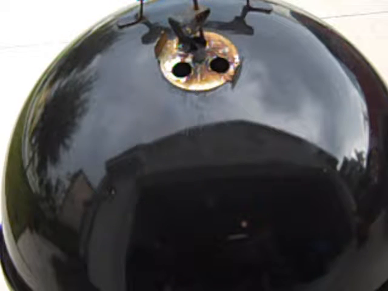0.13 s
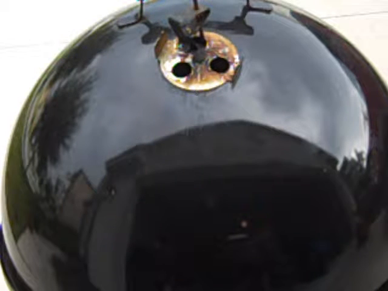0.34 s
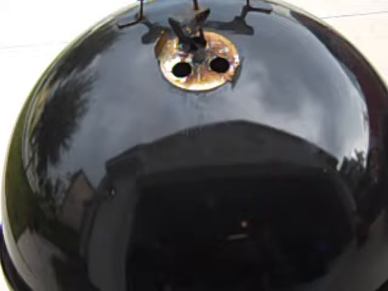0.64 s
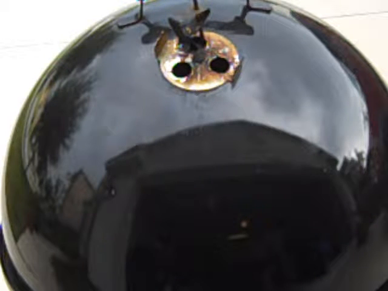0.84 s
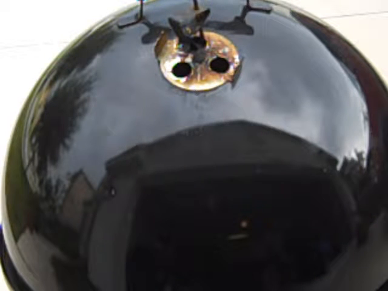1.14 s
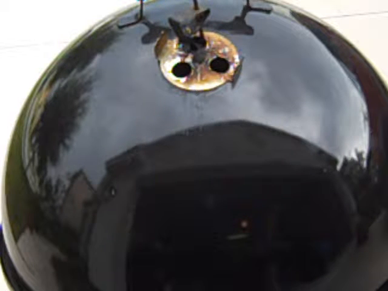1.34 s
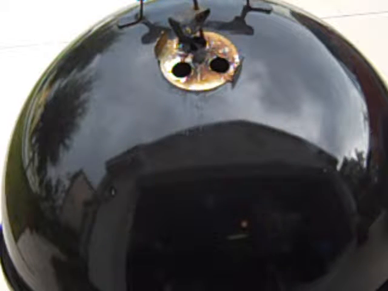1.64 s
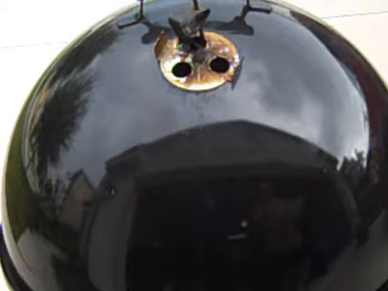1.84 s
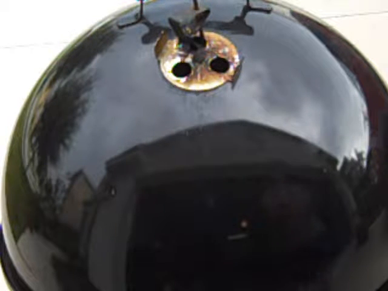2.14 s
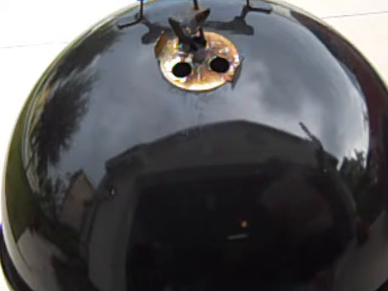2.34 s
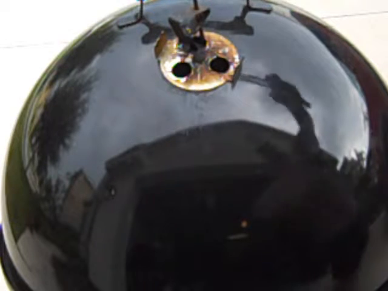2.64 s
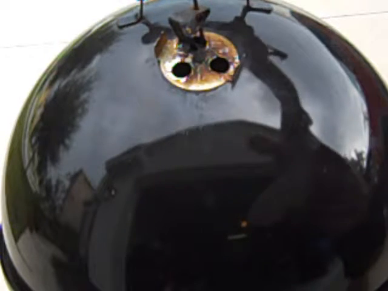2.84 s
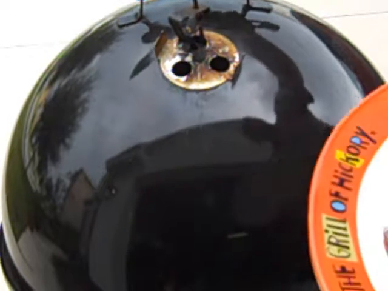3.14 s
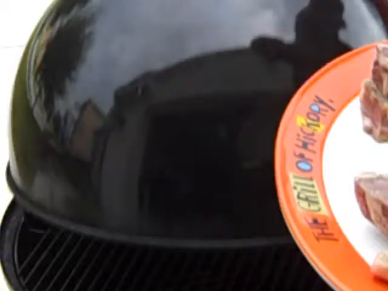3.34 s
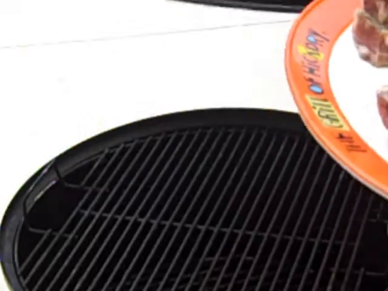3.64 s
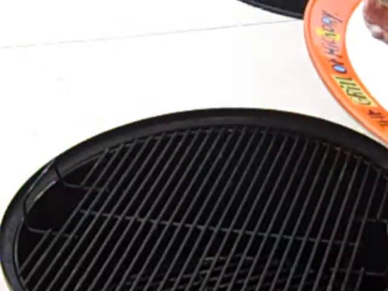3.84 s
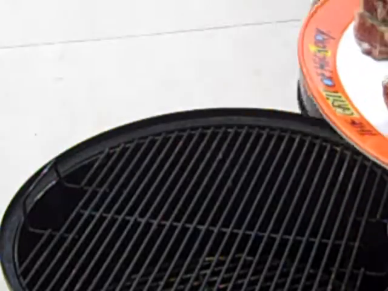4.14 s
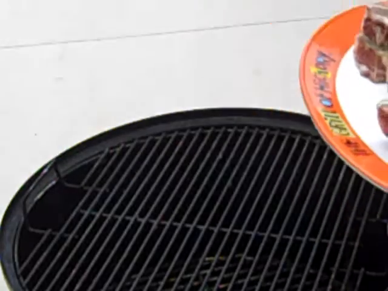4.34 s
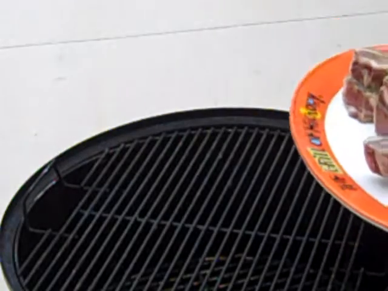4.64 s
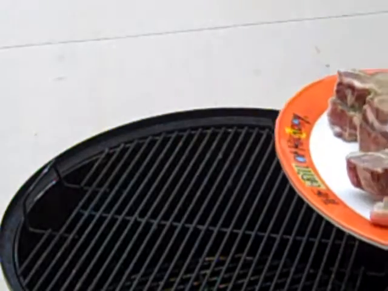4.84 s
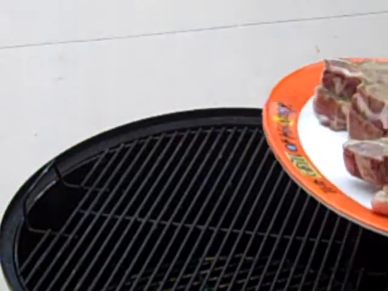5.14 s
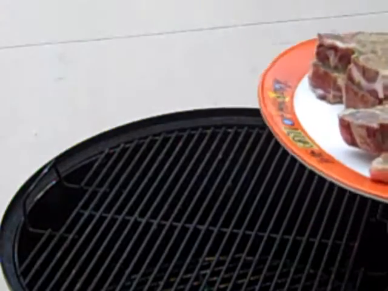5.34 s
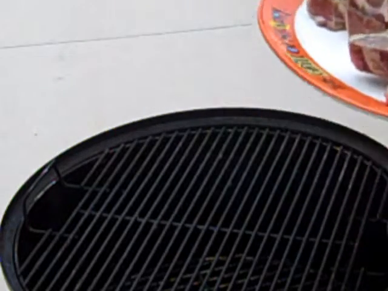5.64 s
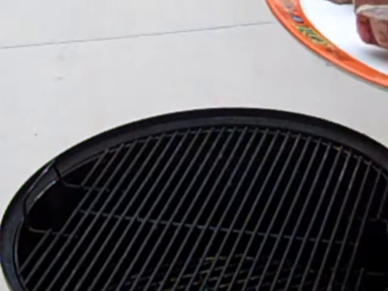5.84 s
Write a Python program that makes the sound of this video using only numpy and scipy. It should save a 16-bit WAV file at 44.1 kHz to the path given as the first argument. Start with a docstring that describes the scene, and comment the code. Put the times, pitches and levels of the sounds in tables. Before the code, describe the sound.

Outdoors over faint traffic rumble and hiss, shoes scuff, steel tongs rattle, then a metal lid clangs down on concrete with a short grind.

```python
"""A kettle grill on a concrete drive, under far traffic rumble and a faint steady hiss (banded noise).
Shoes scuff (clumped grit clicks), a small steel part pings (ringing modes), a dull pop follows, then steel
tongs rattle in a hand (crowded modes struck in chatter). The domed lid's rim drags (rubbing grains), shoes
scuff again, and the lid is set down: thump and clang (struck modes), then a fading grind under more rattle."""
import sys
import numpy as np
from scipy import signal
from scipy.fft import rfft, irfft, next_fast_len
from scipy.io import wavfile

SR = 44100
rng = np.random.default_rng(int(sys.argv[2]) if len(sys.argv) > 2 else 0)


def unload_audio(sound):
    """Save the sound as a 16-bit wav file, at the path given as the first command line argument."""
    columns = np.transpose(np.atleast_2d(sound))
    # keep every value between -1 and 1, then stretch to whole-number steps
    steps = np.round(np.clip(columns, -1, 1) * 32767)
    wavfile.write(sys.argv[1], SR, steps.astype(np.int16))


N = 264159

# far traffic swells: t/s, deep rumble level/dB, low rumble level/dB
TRAFFIC_SWELLS = [(0, -5, -4), (1.2, -6.5, -5.5), (1.6, 0.5, -4), (2.1, -4.5, -5), (2.8, -4.5, -5),
                  (3.7, -1, -3.5), (4.1, -6.5, -3.5), (4.35, 0.5, 1.5), (4.75, -4, -1.5), (5.99, -3.5, -4)]
# spectrum of rumble and hiss: f/Hz, density level/dB per Hz
AIR_SPECTRUM = [(13, -87), (26, -39), (48, -4), (95, -3.5), (123, -1), (200, -9), (330, -7.5), (462, -15.5),
                (900, -20), (2960, -28.5), (5000, -31.5), (7400, -29), (9000, -35), (11000, -50.5),
                (13800, -54)]
# left-right likeness of the air: f/Hz, likeness/1
AIR_LIKENESS = [(60, 0.99), (230, 0.99), (890, 0.91), (3450, 0.53), (13300, 0.31)]

# shoe scuffs: start t/s, peak level/dB, rise/s, hold/s, fade/(dB/s), sole band level/dB
SHOE_SCUFFS = [(0.376, -40, .034, .01, 40, -4), (0.668, -31.5, 0.014, .002, 147, -4),
               (2.626, -52, 0.03, 0.063, 64, -3), (3.673, -42, 0.039, 0.059, 10, -1.5),
               (3.835, -29, 0.065, 0.079, 590, 3.5)]
# spectrum of grit under a sole: f/Hz, density level/dB per Hz
GRIT_SPECTRUM = [(290, -49), (558, -33), (650, -14), (1550, -11), (2130, -3), (2440, -6), (3490, -3),
                 (4870, -10.5), (6960, -5), (10800, -22.5), (13500, -99)]
SCUFF_RISE_DB, SCUFF_LONGEST_S = 30.5, 0.29   # the sole presses down; lifts at the latest then

# dull pop close by: t/s, peak level/dB
DULL_POP = [(1.3675, -31)]
POP_WIDTH_S = 0.00027

# knock on a small steel part: t/s, peak level/dB
PING_KNOCK = [(0.685, -20)]
# its modes: f/Hz, level/dB, t60/s
PING_RING = [(1344, 8, 0.3), (1670, 5, 0.23), (2010, 8, 0.13), (2426, 19, 0.06), (4370, 16, 0.059),
             (6923, 11, 0.37), (7117, -6, 0.44), (8030, 8, 0.42), (9230, 11, 0.2)]

# tongs and grit clicks: t/s, peak level/dB, colour centre f/Hz, chatter length/s,
# chatter level against the first touch/dB (before a common 3 dB cut)
TONG_CLICKS = [(0.673, -35.5, 3000, 0.012, -15), (1.6576, -10, 7400, 0.028, -27),
               (1.697, -21.5, 6540, 0.064, -26.5), (1.79, -22.5, 5900, 0.073, -12),
               (1.827, -14.5, 7740, 0.014, -13), (1.8684, -17.5, 6350, 0.029, -15),
               (1.9037, -18, 7560, 0.038, -16), (1.957, -22, 7100, 0.01, -15),
               (1.9636, -16.5, 7500, 0.0065, -6), (1.97, -7, 7700, 0.0044, -13),
               (1.977, -12, 8150, 0.017, -12), (1.991, -20, 7900, 0.011, -12),
               (2.01, -29.5, 6800, 0.12, -3), (2.1925, -28, 6460, 0.013, -3),
               (2.228, -20, 9400, 0.011, -20.5), (2.787, -37.5, 9000, 0.01, -20),
               (3.146, -22, 5400, 0.014, -4), (3.8074, -17, 3200, 0.008, -39),
               (4.257, -41.5, 9500, 0.012, -10), (4.406, -32.5, 2610, 0.016, -38),
               (4.468, -36, 6900, 0.018, -26), (5.3245, -30.5, 4800, 0.028, -18),
               (5.49, -37.5, 7700, 0.03, -10), (5.5654, -22.5, 7350, 0.022, -19.5),
               (5.579, -17, 6560, 0.028, -21), (5.601, -20, 7700, 0.011, -13),
               (5.6387, -18.5, 7800, 0.013, -19), (5.654, -19.5, 6500, 0.014, -19.5),
               (5.7403, -27.5, 6900, 0.03, -16.5), (5.779, -29, 7820, 0.012, -21),
               (5.8082, -24, 7600, 0.017, -13), (5.885, -22.5, 6650, 0.016, -15),
               (5.9447, -26.5, 6760, 0.018, -17)]
# strength of the crowded modes of the tongs: f/Hz, level/dB
TONG_SPECTRUM = [(590, -57), (1000, -19), (2720, -11), (3580, -8.5), (5770, -5), (6580, 3), (7660, 7.5),
                 (9530, 0.5), (12900, -8.5), (13500, -36)]
# where the tongs are: t/s, left-right level at 8 kHz/dB
HAND_PAN = [(1.65, 1), (1.9, 0), (2.2, 6.5), (5.5, 5), (5.95, 6)]
COLOUR_OCTAVES = 0.82   # a blow is 6 dB weaker this far from its colour centre

# lid rim meets concrete: t/s, clang peak level/dB, thump peak level/dB
LID_LANDINGS = [(4.946, -20, -11.5), (4.9725, -5.5, -15)]
# modes of the dome: f/Hz, level/dB, t60/s
DOME_MODES = [(150, 2.5, 0.056), (207, 2.5, 0.051), (288, 6, 0.025), (388, -7, 0.088), (459, -10.5, 0.071),
              (520, -13, 0.19), (552, -7.5, 0.28), (721, -22, 0.12), (811, -13, 0.23)]
# modes of the rim: f/Hz, level/dB, t60/s
RIM_MODES = [(1737, -14, 0.065), (3410, -5, 0.043), (3542, 2, 0.084), (3740, 10, 0.04), (3626, 6, 0.05),
             (3850, -6, 0.23), (3935, -8, 0.26), (4160, -16, 0.96)]
# spectrum of the rubbing rim: f/Hz, density level/dB per Hz
GRIND_SPECTRUM = [(880, -56), (1600, -24), (2900, -18.5), (3350, -5), (4150, 1), (5240, -9), (7360, -2.5),
                  (10200, -22), (12500, -19), (13500, -54)]
# the rim drags off the kettle: t/s, level/dB
LID_LIFT = [(3.18, -56), (3.24, -46.5), (3.35, -63)]
# levels at the first and last landing, then the fade
GRIND_BEFORE_DB, GRIND_DB, GRIND_FADE_DB_PER_S = -32.5, -28, 51.5

# ground sounds at the left port: f/Hz, phase lead/rad, gain level/dB
GROUND_TO_LEFT = [(1670, -0.16, -0.5), (3600, -1.5, -0.5), (4370, -0.7, -1.5), (7300, 1.46, 0),
                  (8500, -1.5, 6.5), (13100, -3, 1.5)]
WALLS_T60_S, WALLS_DB, WALLS_AFTER_S = 0.23, -9, 0.0028   # scattered echoes of house and garage
LEFT_PORT_DB, CUTOFF_HZ = -0.63, 13900


def from_db(db):
    """Decibels to gain."""
    return 10 ** (np.asarray(db) / 20)


def rms_one(x):
    """Scale to unit rms."""
    return x / np.sqrt(np.mean(x ** 2) + 1e-20)


def in_time(rows):
    """Columns of a curve at every sample."""
    s, *columns = np.transpose(rows)
    return [np.interp(np.arange(N) / SR, s, c) for c in columns]


def while_sounding(rows):
    """1 within the span of a curve, 0 outside, with soft edges."""
    t = np.arange(N) / SR
    to_edge_s = np.minimum(t - rows[0][0], rows[-1][0] - t)
    return np.clip(to_edge_s / 0.0028, 0, 1)


def stroke(start_s, rows):
    """Gain of a curve of (s after the start, dB), silent outside it."""
    rows = [(start_s + s, db) for s, db in rows]
    return from_db(in_time(rows)[0]) * while_sounding(rows)


def at_hz(points, hz):
    """Read a table on a log-frequency axis."""
    table_hz, values = np.array(points).T[:2]
    return np.interp(np.log(hz), np.log(table_hz), values)


def coloured(x, spectrum):
    """Shape a long sound by a spectrum; rms 1."""
    size = next_fast_len(N)
    hz = np.maximum(np.arange(size // 2 + 1) * SR / size, 1)
    shaped = rfft(x, size) * from_db(at_hz(spectrum, hz))
    return rms_one(irfft(shaped, size)[..., :N])


def drift(rate_hz):
    """Slow chance, rms 1: noise through a double pole, computed every 40 samples."""
    r = np.exp(-80 * np.pi * rate_hz / SR)
    noise = rng.standard_normal(N // 40 + 2002)
    slow = signal.lfilter([1], [1, -2 * r, r * r], noise)[2000:]   # skip the filter's start
    return np.interp(np.arange(N) / 40, np.arange(len(slow)), rms_one(slow))


def grains(per_s, spread_db, size=N):
    """Random clicks of uneven size and sign."""
    size_db = spread_db * np.minimum(rng.exponential(1, size), 4)
    sizes = from_db(size_db) * rng.choice([-1, 1], size)
    return sizes * (rng.random(size) < per_s / SR)


def stereo(x, other, alike):
    """Left and right share x and differ by a second sound."""
    alike = np.clip(alike, 0, 1)
    return (np.sqrt(1 + alike) * x + np.sqrt(1 - alike) * other * [[1], [-1]]) / np.sqrt(2)


def crowded(spectrum, t60_s, count):
    """Many unrelated modes under a spectrum; higher ones tend to die sooner (t60_s holds near 6 kHz)."""
    points = np.array(spectrum)[1:-1, 0]
    hz = np.geomspace(points[0], points[-1], count) * np.exp(rng.normal(0, 0.0143, count))
    decay_s = t60_s * (hz / 6000) ** -.5 * np.exp(rng.normal(0, 0.078, count))
    return np.transpose([hz, at_hz(spectrum, hz), decay_s])


def struck(modes, gains_db, scatter_db, size, pan_db=0, start_rad=0):
    """Ring after one blow; each mode has its own phase at each port, treble leans most to a side."""
    hz, level_db, t60_s = np.transpose(modes)
    t = np.arange(size) / SR
    rates = 2j * np.pi * hz - np.log(1000) / np.clip(t60_s, .01, 1.5)
    waves = np.exp(t * rates[:, None])
    strength_db = level_db + gains_db + scatter_db * rng.standard_normal(len(hz))
    strength = from_db(strength_db) * np.exp(1j * start_rad)
    turn_rad = rng.normal(0, .6, len(hz)) * np.minimum(hz / 7000, 1)
    lean = pan_db * (hz / 8000) * np.log(10) / 40 + 1j * turn_rad
    return np.imag([strength * np.exp(side * lean) @ waves for side in (1, -1)])


def add(out, sound, s, peak_db):
    """Place a stereo sound at a time, with a given peak of its left-right mean."""
    at = round(s * SR)
    gain = from_db(peak_db) / np.max(np.abs(sound.mean(axis=0)))
    out[:, at:at + sound.shape[1]] += (gain * sound)[:, :N - at]


def air():
    """Half-octave bands of noise; rumble swells with the traffic and is patchy, hiss stays smoother."""
    deep_db, low_db = in_time(TRAFFIC_SWELLS)
    edges_hz = 22 * 2 ** np.arange(0, 9.6, .5)
    noise = coloured(rng.standard_normal((2, 2, N)), AIR_SPECTRUM)
    out = 0
    for k, (low, high) in enumerate(zip(edges_hz, edges_hz[1:])):
        hz = np.sqrt(low * high)
        bandpass = signal.butter(2, [low, high], "band", fs=SR, output="sos")
        band = signal.sosfilt(bandpass, noise[k % 2])   # neighbours use separate noise
        swell_db = deep_db if hz < 160 else low_db if hz < 420 else 0
        patchy_db = 1.5 if hz < 1000 else .7
        gain = from_db(swell_db + patchy_db * drift(10.1))
        out = out + gain * stereo(*band, at_hz(AIR_LIKENESS, hz))
    return from_db(-44.0) * rms_one(out)


def scuffs():
    """Grit rolls under a sole: dense clicks in clumps; a heavier slide brings out a band around 3 kHz."""
    clumps = from_db(2.0 * drift(28))
    ports = [coloured(clumps * grains(5000, 2.2), GRIT_SPECTRUM) for port in range(2)]
    grit = stereo(*ports, 0.7)
    sole = signal.sosfilt(signal.butter(2, [1900, 4800], "band", fs=SR, output="sos"), grit)
    out = 0
    for s, peak_db, rise_s, hold_s, fade_db_per_s, sole_db in SHOE_SCUFFS:
        held_s = rise_s + abs(hold_s)
        end_db = peak_db - fade_db_per_s * (SCUFF_LONGEST_S - held_s)
        gain = stroke(s, [(0, peak_db - SCUFF_RISE_DB), (rise_s, peak_db), (held_s, peak_db),
                          (SCUFF_LONGEST_S, end_db)])
        out = out + gain * (grit + (from_db(sole_db) - 1) * sole)
    return out


def pop(size=200):
    """A single pull and push of air."""
    out = np.zeros((2, N))
    widths = np.arange(size) / SR / POP_WIDTH_S - 3
    pulse = widths * np.exp(-widths ** 2 / 2)
    add(out, np.tile(pulse, (2, 1)), *DULL_POP[0])
    return out


def ping(size=16000):
    """One sharp knock on a small steel part: ringing modes with a broad crack."""
    out, t = np.zeros((2, N)), np.arange(size) / SR
    ring = struck(PING_RING, 0, 1.8, size, 0.93)
    crack = signal.lfilter([1, 1, -1, -1], [1], rng.standard_normal(size)) * np.exp(-t / 0.002)
    add(out, ring / np.abs(ring).max() + from_db(-12) * crack, *PING_KNOCK[0])
    return out


def clinks(size=9000):
    """A first touch, then loose chatter, into the crowded modes of the steel; blows favour various modes."""
    out, t = np.zeros((2, N)), np.arange(size) / SR
    modes = crowded(TONG_SPECTRUM, 0.016, count=220)
    ring_size = size // 5
    rise = 1 - np.exp(-t[:ring_size] / 0.00017)   # the contact takes a moment to build
    for s, peak_db, hz, chatter_s, chatter_db in TONG_CLICKS:
        chatter_fade = np.exp(-(t / max(chatter_s, .002)) ** 1.6)
        touches = from_db(chatter_db - 3) * grains(4500, 3.6, size) * chatter_fade
        touches[0] = 1
        colour_db = -6.0 * (np.log2(modes[:, 0] / hz) / COLOUR_OCTAVES) ** 2
        pan_db = np.interp(s, *np.transpose(HAND_PAN))
        phases_rad = rng.uniform(0, 2 * np.pi, len(modes))
        ring = rise * struck(modes, colour_db, 3, ring_size, pan_db, phases_rad)
        add(out, signal.fftconvolve(ring, touches[None])[:, :size], s, peak_db)
    return out


def lid(size=12000):
    """Each landing thumps the dome and clangs the rim; rubbing grains drag and grind the rim."""
    out, t = np.zeros((2, N)), np.arange(size) / SR
    wash = crowded(GRIND_SPECTRUM, 0.13, count=400)
    brighter_db = 16.8 * np.log2(wash[:, 0] / 6000)   # a blow is harder than rubbing
    # the thump carries little of its deepest motion
    low_cut = signal.butter(4, 125, "high", fs=SR, output="sos")
    soften = signal.butter(2, 800, fs=SR, output="sos")
    for s, clang_db, thump_db in LID_LANDINGS:
        contact = rng.standard_normal(size) * t * np.exp(-t / 0.0027)   # rough contact lasts some ms
        phases_rad = rng.uniform(0, 2 * np.pi, len(wash))
        clang = struck(RIM_MODES, 0, 1.6, size)
        clang = clang + from_db(-13.0) * struck(wash, brighter_db, 2.5, size, 2.1, phases_rad)
        add(out, signal.fftconvolve(clang, contact[None])[:, :size], s, clang_db)
        push = signal.sosfilt(low_cut, -struck(DOME_MODES, 0, 0.85, size))
        # the dome shudders on after the blow
        rocking = from_db(-25) * grains(900, 4.1, size) * np.exp(-t / 0.054)
        rocking[0] = 1
        soft = signal.sosfilt(soften, rocking)
        add(out, signal.fftconvolve(push, soft[None])[:, :size], s, thump_db)
    rubbing = [coloured(grains(9000, 0.49), GRIND_SPECTRUM) for port in range(2)]
    first_s, last_s = LID_LANDINGS[0][0], LID_LANDINGS[-1][0]
    gap_s = last_s - first_s
    grind = stroke(first_s, [(0, GRIND_BEFORE_DB), (gap_s, GRIND_DB),
                             (gap_s + .5, GRIND_DB - .5 * GRIND_FADE_DB_PER_S)])
    uneven = from_db(0.96 * drift(34))
    return out + (grind + stroke(0, LID_LIFT)) * uneven * stereo(*rubbing, 1.0)


def from_ground(x):
    """The microphone body shades and turns low-lying sounds on their way to the left port."""
    size = next_fast_len(N)
    hz = np.arange(size // 2 + 1) * SR / size
    at, lead_rad, gain_db = np.transpose(GROUND_TO_LEFT)
    gain = from_db(np.interp(hz, at, gain_db))
    turn = np.exp(1j * np.interp(hz, [0, *at], [0, *lead_rad]))
    left = rfft(x[0], size) * gain * turn
    return np.array([irfft(left, size)[:N], x[1]])


def walls(near, size=16000):
    """Near sounds come back thin and scattered: decaying, band-limited noise as the echo response."""
    t = np.arange(size) / SR
    decay = from_db(-60 * t / WALLS_T60_S) * (t > WALLS_AFTER_S)
    echoes = stereo(*rng.standard_normal((2, size)), 0.29) * decay
    echoes = signal.sosfilt(signal.butter(1, [1200, 11000], "band", fs=SR, output="sos"), echoes)
    echoes = echoes / np.sqrt(np.sum(echoes[0] ** 2))
    return from_db(WALLS_DB) * signal.fftconvolve(echoes, near.mean(axis=0)[None])[:, :N]


def scene():
    """Near sounds, their wall echoes and the air."""
    near = clinks() + ping() + pop() + from_ground(lid() + scuffs())
    return near + walls(near) + air()


def record(dry):
    """The left port is a little quieter; the top is cut steeply, 75 dB down from the cutoff up."""
    ports = dry * from_db([[LEFT_PORT_DB], [0]])
    return signal.sosfilt(signal.cheby2(14, 75, CUTOFF_HZ, fs=SR, output="sos"), ports)


dry = scene()
out = record(dry)
unload_audio(out)
```